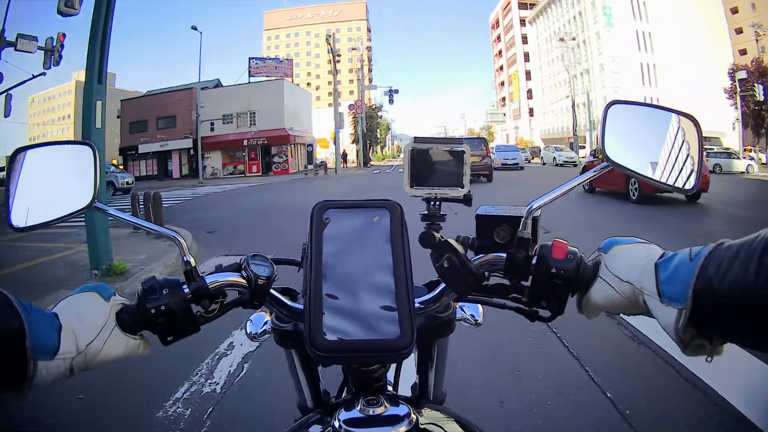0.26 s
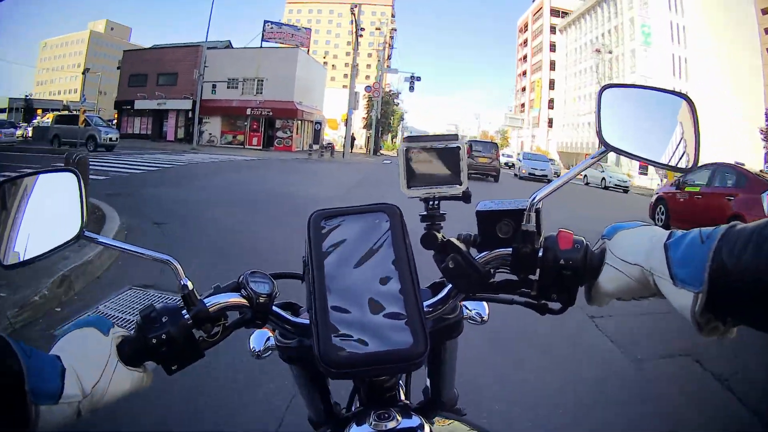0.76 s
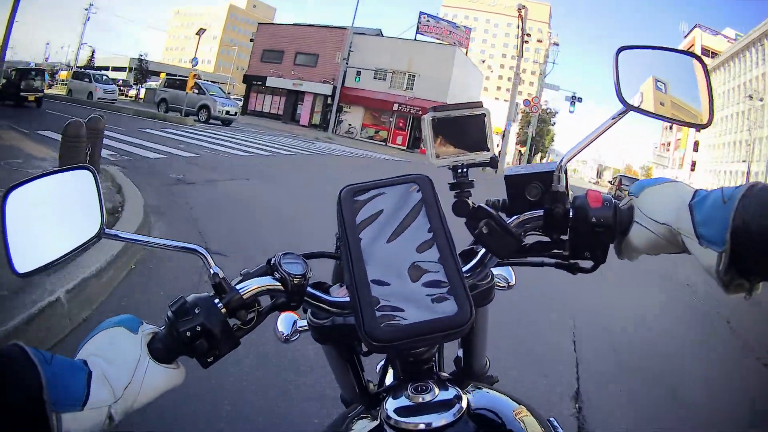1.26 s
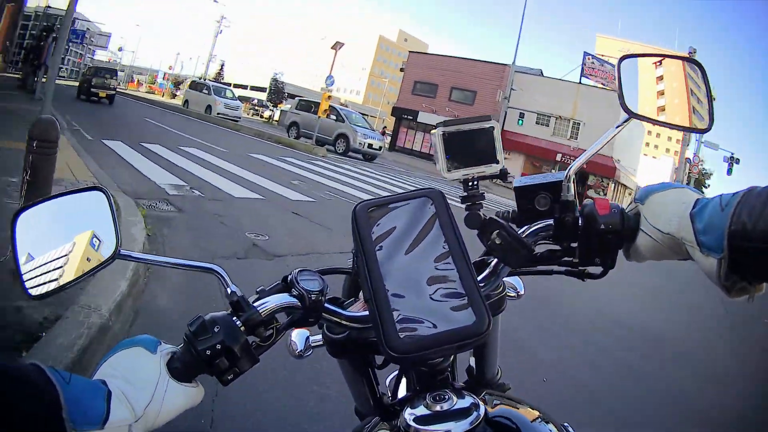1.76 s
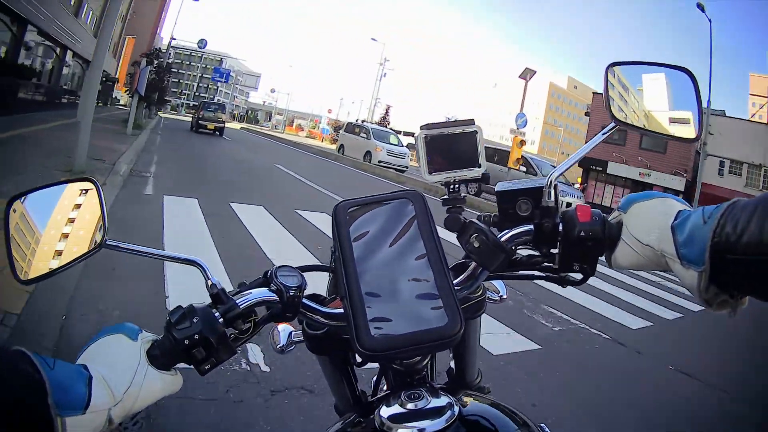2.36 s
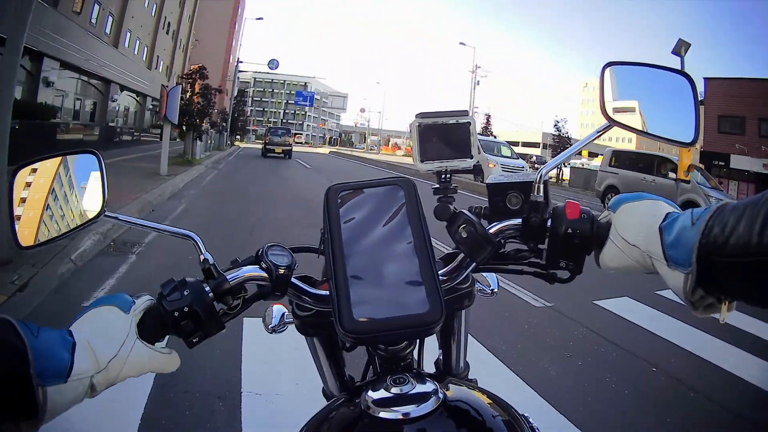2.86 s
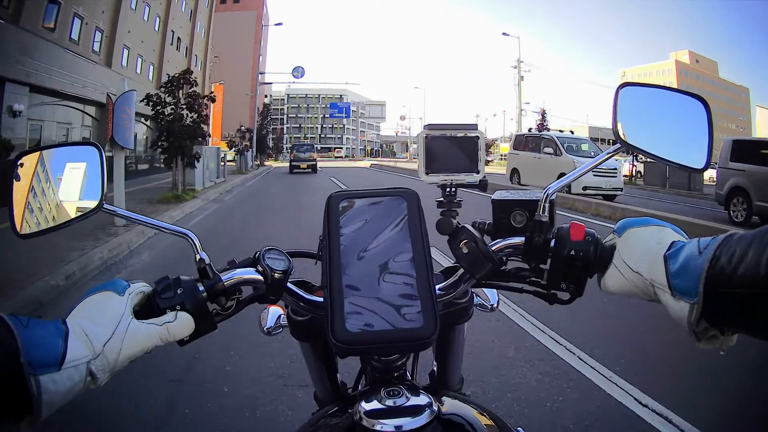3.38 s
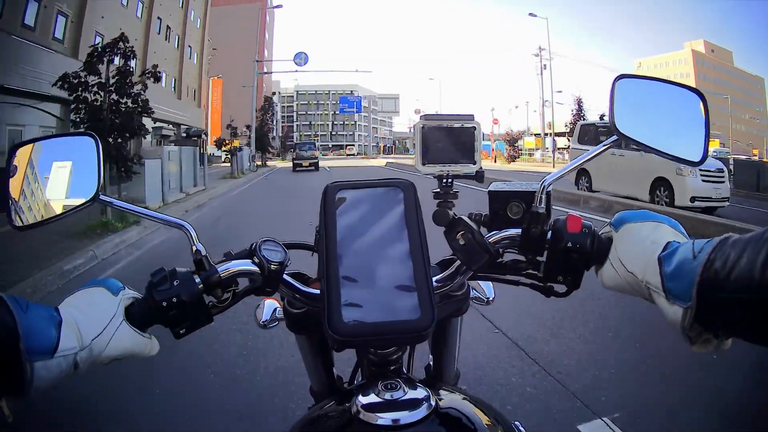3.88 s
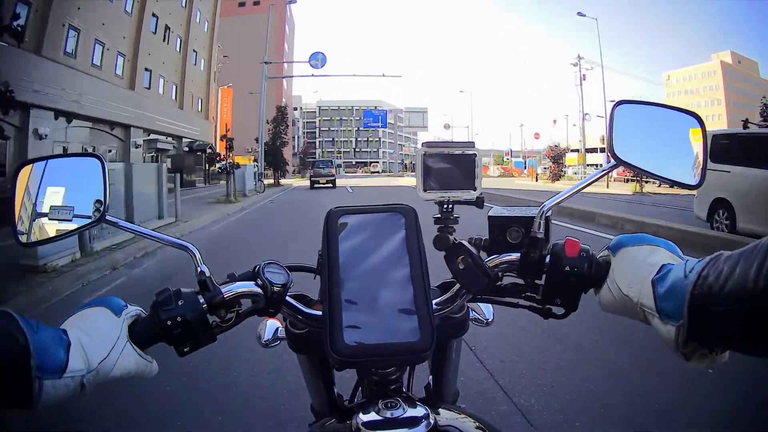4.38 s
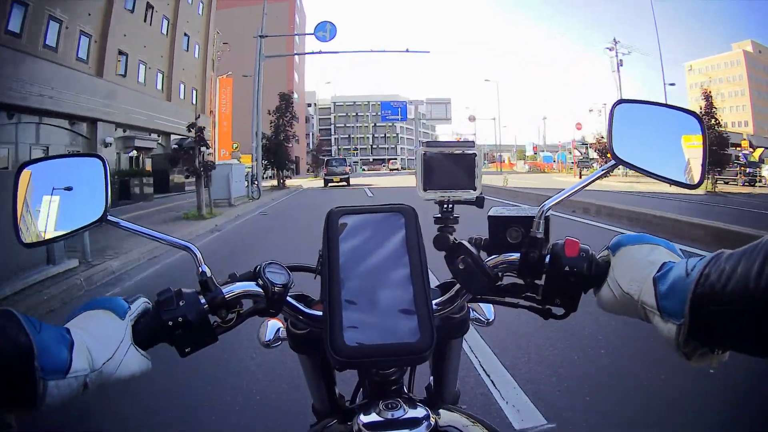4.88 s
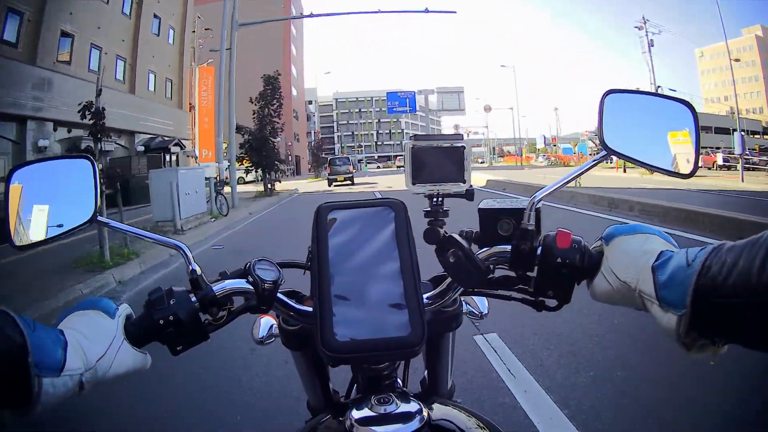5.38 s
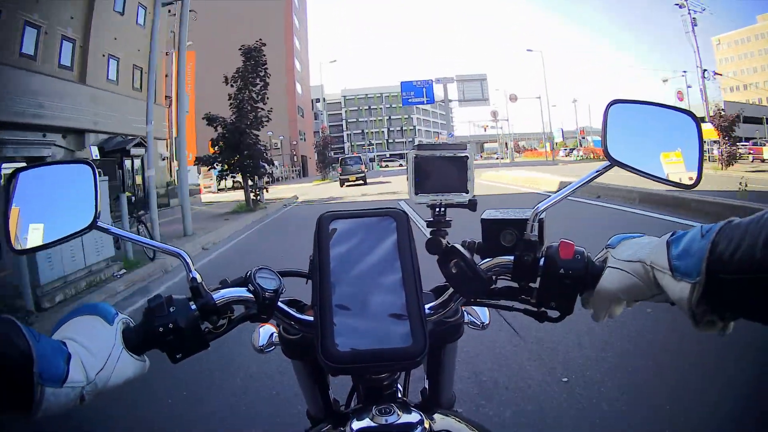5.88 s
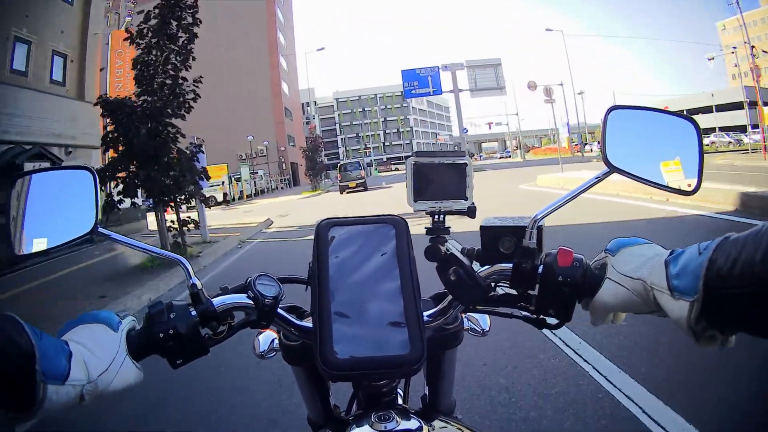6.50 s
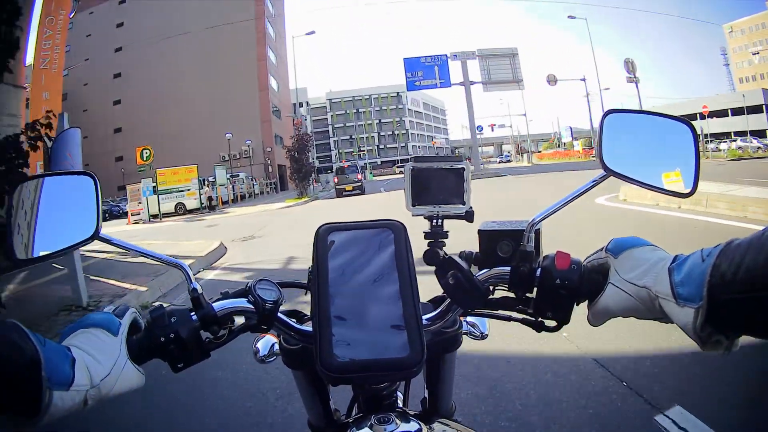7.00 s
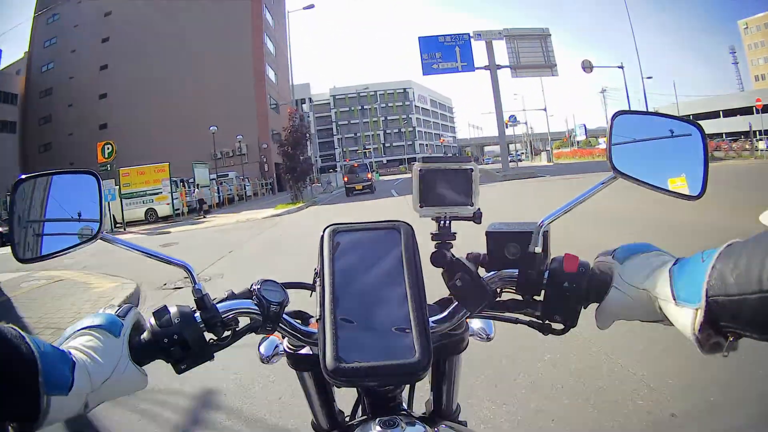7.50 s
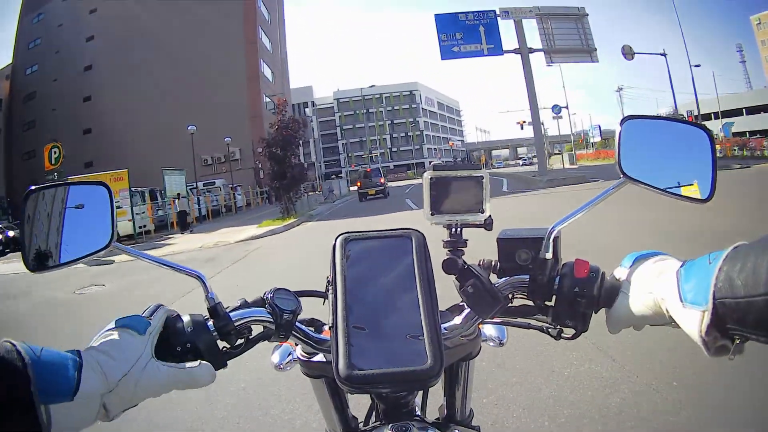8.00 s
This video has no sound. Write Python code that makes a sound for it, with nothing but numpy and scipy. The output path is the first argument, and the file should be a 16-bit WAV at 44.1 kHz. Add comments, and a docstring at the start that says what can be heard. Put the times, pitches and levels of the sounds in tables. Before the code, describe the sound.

A small single-cylinder motorcycle dips off throttle, pulls steadily harder up through the revs, then shuts off with uneven thumps, clunks and rolling coast.

```python
"""A single-cylinder motorcycle leaves a corner, heard from a cased microphone on the rider. The throttle shuts
for half a second, then opens for a long pull: firings thump pipe and silencer modes, suction hisses, the air
box rings, gear tones climb, and tyre roar and gusts of noise swell. At 5.6 s it shuts again: the revs fall and
rise, the thumps turn uneven, metal parts clunk, and bumps and overrun barks knock the frame; it rolls on with
thin gear tones. A faint electronic tone lasts throughout."""
import sys
import numpy as np
from scipy import signal
from scipy.io import wavfile
from scipy.ndimage import uniform_filter1d

SR = 44100
rng = np.random.default_rng(int(sys.argv[2]) if len(sys.argv) > 2 else 0)


def digitize_waveform(pressure):
    """Quantize a signal to 16-bit integers and store it at the path in sys.argv[1].

    Rows of a 2-D input are taken as channels; values are limited to [-1, 1].
    """
    field = np.atleast_2d(pressure).T
    bounded = np.clip(field, -1, 1)
    quanta = np.round(bounded * 32767).astype(np.int16)
    wavfile.write(sys.argv[1], SR, quanta)


N = 363825


# exhaust load: (time [s], relative thump level [dB])
THUMP_LOAD = [(0.0, -29), (0.55, -27), (0.87, -35.5), (1.06, -31), (1.15, -26.5), (1.35, -26),
              (2.44, -23.5), (3.86, -24), (4.37, -18), (5.47, -18), (5.63, -22), (5.79, -33.5), (6.25, -24),
              (6.43, -46), (6.56, -31), (6.6, -19), (6.8, -28.5), (7.0, -30.5), (7.31, -30), (7.5, -32),
              (7.78, -34), (7.95, -27), (8.25, -35)]
# off the throttle some firings burn fully and some miss: (time [s], relative level [dB])
UNEVEN_FIRINGS = [(.607, -26), (.662, -23), (.74, -26), (.933, -17.5), (1.068, -23.5), (5.612, -9.5),
                  (5.684, -20), (5.764, -17), (5.8, -19.5), (5.84, -19), (5.923, -15.5), (6.097, -12),
                  (6.2, -34), (6.31, -21), (6.37, -15.5), (6.425, -23.5), (6.485, -13.5), (6.545, -18),
                  (6.6, -12), (6.657, -19), (6.703, -15.5), (6.76, -17), (6.855, -17), (6.902, -16.5),
                  (6.95, -18), (6.991, -16), (7.096, -16.5), (7.291, -24), (7.387, -19.5), (7.44, -21),
                  (7.487, -17), (7.535, -17.5), (7.686, -16.5), (7.74, -24), (7.788, -25), (7.842, -18.5),
                  (7.943, -16), (7.994, -17), (8.05, -21), (8.1, -18), (8.154, -22.5), (8.204, -17)]
# upper exhaust pipe modes: (frequency [Hz], level [dB], t60 [s], rise [s])
UPPER_PIPE_MODES = [(228.8, -8, 0.12, 0.0084), (321.4, 4.5, 0.082, 0.0042), (340.9, 5, 0.083, 0.011),
                    (386.4, 1.5, 0.087, 0.0081)]
# silencer shell: (frequency [Hz], level [dB], t60 [s], rise [s])
SILENCER_SHELL = [(413, 15.5, 0.0073, 0.0013), (540.7, -13, 0.13, 0.033), (736.8, -9.5, 0.12, 0.0054),
                  (910, -19.5, 0.07, 0.01)]
# low engine orders: (multiple of the firing rate, level [dB])
ENGINE_ORDERS = [(2, -19), (3, -19), (4, -9), (5, 0)]
# shell growl over the thump, a level law (columns at law())
GROWL_LAW = (-10.5, 7.5, 0.5, 11)


def exhaust():
    """One pressure pulse a firing, with some turbulence, rings the pipe and the silencer."""
    thump_db, bark_db = curves(THUMP_LOAD)[0], curves(INLET_LEVELS)[0]
    growl_db, orders_db = law(*GROWL_LAW), by_speed(ORDERS_COL)
    upper = ring(UPPER_PIPE_MODES)
    drive = exhaust_drive(thump_db, upper)
    late = np.zeros(round(.003 * SR))  # the upper modes answer a moment after the pulse
    bark = signal.oaconvolve(drive, np.r_[late, upper])[:N]
    growl = signal.oaconvolve(drive, ring(SILENCER_SHELL))[:N]
    turn = 2 * np.pi * crank()
    orders = evened(sum(gain_of(db) * np.cos(k * turn) for k, db in ENGINE_ORDERS))
    return (exhaust_thump(drive, thump_db) + gain_of(bark_db) * bark + chamber(np.r_[late, drive][:N])
            + gain_of(growl_db) * growl + gain_of(thump_db + orders_db) * orders)


RETARD_S = .0024  # the pulse comes later with the throttle shut


def exhaust_drive(thump_db, upper):
    """Pressure pulses of varying strength, each trailing a fading burst of turbulence."""
    at, low = firings(.016), ring(LOW_PIPE_MODES)
    chance_db = .7 * rng.standard_normal(len(at))
    size = gain_of(thump_db[at] + chance_db) * np.sqrt(np.gradient(at)) / np.linalg.norm(low)
    for s, level_db in UNEVEN_FIRINGS:
        nearest = np.argmin(abs(at + .011 * SR - s * SR))
        size[nearest] = gain_of(level_db) / abs(low + upper).max()
    delay = np.round(RETARD_S * SR * (1 - throttle()[at])).astype(int)
    pulses = np.zeros(N)
    pulses[np.minimum(at + delay, N - 1)] = size
    t = np.arange(SR // 8) / SR
    swirl = signal.oaconvolve(pulses, np.exp(-t / 0.016))[:N] * rng.standard_normal(N)
    return pulses + gain_of(-49) * swirl


# steady pipe noise over the thump, a level law (columns at law())
DRONE_LAW = (-26.5, -1.5, 2.3, 11)
BASS_CUT_HZ = 76
MUFFLE_HZ, MUFFLE_WIDTH_HZ = 203, 30  # the silencer swallows this band


def exhaust_thump(drive, thump_db):
    """Low pipe modes answer the pulses and an echo from the open end; steady noise drones in the pipe."""
    bass_cut = signal.butter(4, BASS_CUT_HZ, "high", fs=SR, output="sos")
    thump = signal.sosfilt(bass_cut, pipe(drive))
    echo = round(.0066 * SR)
    thump[echo:] += 1.1 * thump[:-echo]
    drone = evened(pipe(rng.standard_normal(N)))
    thump = .5 * thump + gain_of(thump_db + law(*DRONE_LAW)) * drone
    return signal.lfilter(*signal.iirnotch(MUFFLE_HZ, MUFFLE_HZ / MUFFLE_WIDTH_HZ, SR), thump)


# low exhaust pipe modes, gas cold: (frequency [Hz], level [dB], t60 [s], rise [s])
LOW_PIPE_MODES = [(123, -3.5, 0.09, 0.0078), (144.3, 7, 0.13, 0.00081), (173, -7.5, 0.034, 0.0015)]
# warmth of the exhaust gas: (time [s], heat [0-1])
GAS_HEAT = [(0, 0), (3.9, 0.4), (4.9, 0.8), (5.3, 0.76), (5.65, 0.72), (5.8, 0.6), (8.25, 0)]
HOT_SHARE = 0.082  # the low pipe modes rise by this share as the gas heats
COLD_RING = 1.046  # cool gas rings longer by this factor


def pipe(x, count=3):
    """The low pipe modes, tuned and damped by the heat of the gas; fixed heats are crossfaded."""
    step = np.clip(curves(GAS_HEAT)[0], 0, 1) * (count - 1)
    total = 0
    for k, heat in enumerate(np.linspace(0, 1, count)):
        share = np.clip(1 - abs(step - k), 0, 1)
        response = ring(LOW_PIPE_MODES, 1 + HOT_SHARE * heat, COLD_RING ** (1 - heat))
        total = total + signal.oaconvolve(x * share, response)[:N]
    return total


# silencer chamber, its pitch moving with time: (time [s], frequency [Hz], level over the drive [dB])
CHAMBER_PITCH = [(0, 254, -17.5), (2.1, 252, -16.5), (2.9, 267, -9.5), (3.7, 300, -6), (4.1, 301.4, -3),
                 (4.45, 304, -11), (4.75, 306.7, -6.5), (5.0, 300, -13), (5.3, 304.6, -5.5),
                 (5.7, 299.7, -10.5), (8.25, 254, -12)]
CHAMBER_WIDTH_HZ = 26.5


def chamber(x):
    """A resonance that follows its pitch curve: shift down, smooth twice, shift back."""
    hz, over_db = curves(CHAMBER_PITCH)
    turn = np.exp(2j * np.pi * np.cumsum(hz) / SR)
    r = np.exp(-np.pi * CHAMBER_WIDTH_HZ / SR)
    smooth = signal.lfilter([np.e * (1 - r)], [1, -2 * r, r * r], x / turn)  # peak 1 for one click
    return gain_of(over_db) * (turn * smooth).imag


# (time [s], bark of the upper pipe modes over the thump [dB], relative suction hiss level [dB])
INLET_LEVELS = [(0, 0.5, -70), (.55, -1, -68), (.7, 3, -66), (1.1, 0.5, -65.5), (1.5, 0.5, -63.5),
                (1.8, -1, -56), (2.5, 2, -54.5), (3.3, 2, -55), (3.95, 5, -53), (4.4, -1.5, -51),
                (5.4, 2.5, -48.5), (5.6, 0.5, -52), (5.9, 7, -54), (6.3, -2, -69), (6.7, -1.5, -57.5),
                (7.3, -0.5, -69), (8.25, -3.5, -72)]
# the inlet valve opens this share of a cycle plus this long ahead of the cycle mark
VALVE_LEAD, VALVE_EARLY_S = .27, .0105
# suction after the valve opens: (delay [s], length [s], level [dB])
SUCTION_GULPS = [(0, 0.0046, -6.5), (.0055, .004, -7), (0.014, .008, -0.5)]
# colour of the suction hiss: (frequency [Hz], level [dB per Hz])
SUCTION_COLOUR = [(1500, -22.5), (1830, 9.5), (2000, 2), (2210, 4.5), (2310, -19.5), (2410, 0.5),
                  (2600, -0.5), (2860, -6), (3300, -7), (4000, -10.5), (5000, -20.5), (6500, -52)]


def intake():
    """The inlet valve snaps and suction hisses in gulps; air rasps into the box, which rings."""
    hiss_db = curves(INLET_LEVELS)[1]
    rings, rasp = air_box_rings(), rushing_air()
    gulps = sum(gain_of(db) * puffs(VALVE_EARLY_S - delay, length, VALVE_LEAD)
                for delay, length, db in SUCTION_GULPS)
    snap = valve_snap(hiss_db)
    suction = (0.5 + 0.6 * evened(gulps)) * noise(SUCTION_COLOUR, patchy_db=-1.5, size=512)
    return rings + rasp + snap + gain_of(hiss_db) * suction


# air box, main, lower and middle ring: (frequency [Hz], level before evening out [dB], t60 [s], rise [s])
AIR_BOX_MODES = [(1575, 0, .029, .006), (1295, 0, .04, .005), (1440, 0, .018, .004)]


def air_box_rings():
    """Each firing knocks three air-box modes with a slightly uneven pulse and a puff of noise."""
    rings = 0
    levels = [by_speed(column) for column in (RING_COL, LOWER_RING_COL, MIDDLE_RING_COL)]
    for db, mode, early_s in zip(levels, AIR_BOX_MODES, (.0015, .007, .011)):
        pulses = np.zeros(N)
        at = firings(early_s)
        pulses[at] = gain_of(1.5 * rng.standard_normal(len(at)))
        drive = pulses + gain_of(-38) * puffs(early_s + .002, .012) * rng.standard_normal(N)
        rings = rings + gain_of(db) * evened(signal.oaconvolve(drive, ring([mode]))[:N])
    return rings


# air rushing into the box: (frequency [Hz], level [dB per Hz])
RASP_COLOUR = [(1050, -15.5), (1250, -7.5), (1400, 4.5), (1520, -3.5), (1650, -2), (1750, -28)]


def rushing_air():
    """Patchy band noise puffs with each firing as air rushes into the box."""
    level_db = by_speed(MIDDLE_RING_COL) - 7  # under the middle ring
    return gain_of(level_db) * puffs(0.015, 0.0054) * noise(RASP_COLOUR, patchy_db=7.5, size=512)


# inlet tract: (frequency [Hz], level [dB], t60 [s], rise [s])
INLET_TRACT = [(600, 6, .015, .001), (1830, -2, .035, .0005), (2020, 0, .025, .0005),
               (2210, 0, .035, .0005), (2410, -2, .035, .0005), (2650, -4, .03, .0005),
               (2860, -6, .03, .0005), (3150, -9, .02, .0005)]


def valve_snap(hiss_db):
    """The opening inlet valve strikes the tract with a click and a short scrape, never twice alike."""
    at, clicks = firings(VALVE_EARLY_S + .001, VALVE_LEAD), np.zeros(N)
    clicks[at] = gain_of(1.2 * rng.standard_normal(len(at)))
    burst = signal.windows.hann(round(.005 * SR))
    scrape = signal.oaconvolve(clicks, burst, "same") * np.sign(rng.standard_normal(N))
    over_db = law(centre_db=0, per_krpm_db=-5, per_load=0, shut_db=-14)  # over the suction hiss
    snaps = signal.oaconvolve(6 * clicks + scrape, ring(INLET_TRACT))[:N]
    return gain_of(hiss_db + over_db) * evened(snaps)


# two gear pairs, a list for each: (multiple of the firing rate, level [dB])
GEAR_PAIRS = [
    [(38, -8), (39, -7), (40, 0), (41, -1), (42, -2)],
    [(43, -4), (44, 0), (45, -5), (46, -9)],
]
SWAP_RPM, SWAP_DB_PER_KRPM = 2850, 17  # the lower pair takes over above this speed
# engine cover: (frequency [Hz], level [dB], t60 [s], rise [s])
ENGINE_COVER = [(470, -3, .04, .001), (560, 0, .05, .001), (630, 0, .05, .001), (708, 1, .05, .001),
                (790, -2, .04, .001), (860, 0, .05, .001)]


def gears():
    """The whine of two gear pairs climbs with the engine; a dense band of firing harmonics rings the engine
    cover."""
    whine_db, rattle_db = by_speed(WHINE_COL), by_speed(RATTLE_COL)
    harmonics = cluster([(k, 0) for k in range(17, 34)], 5, 3, crank())
    rattle = signal.oaconvolve(harmonics, ring(ENGINE_COVER))[:N]
    swap_db = np.clip(SWAP_DB_PER_KRPM * (curves(CRANK_SPEED)[0] - SWAP_RPM) / 1000, -1.5, 6)
    whine = sum(gain_of(whine_db - 4 + sign * swap_db) * cluster(pair, 1.9, 7, crank())
                for sign, pair in zip((1, -1), GEAR_PAIRS))
    return overrun_tones() + whine + gain_of(rattle_db) * evened(rattle)


# gearbox shaft while rolling: (time [s], speed [turns per s])
SHAFT_SPEED = [(0, 22), (6.55, 21.75), (6.9, 20.95), (7.3, 20.35), (7.57, 20.1), (8.25, 18.9)]
# thin gear tones on the overrun: (multiple of the shaft rate, start [s], end [s], level [dB])
OVERRUN_TONES = [(26, 6.58, 7.3, -44), (35, 6.6, 6.95, -49), (39, 6.55, 6.83, -45), (42, 6.88, 7.32, -43),
                 (42, 7.56, 8.0, -43)]


def overrun_tones():
    """Thin wavering tones at multiples of the gearbox shaft speed fade in and out."""
    t = np.arange(N) / SR
    shaft = np.cumsum(curves(SHAFT_SPEED)[0]) / SR
    tones = 0
    for k, start, end, db in OVERRUN_TONES:
        fade = np.clip(np.minimum(t - start, end - t) / .06, 0, 1)
        tones = tones + gain_of(db) * fade * cluster([(k, 0)], 2.2, 4, shaft)
    return tones


# gearbox and chassis clunks: (time [s], relative level [dB])
CLUNK_HITS = [(1.299, -21), (5.746, -19), (5.904, -41), (5.939, -11.5), (5.961, -16), (6.03, -24),
              (6.091, -34), (6.141, -38), (6.6, -29), (6.7, -21)]
# gearbox casing: (frequency [Hz], level [dB], t60 [s], rise [s])
CASING_MODES = [(413, -6, 0.041, 0.00017), (515, 6.5, 0.018, 0.00062), (680, 5.5, 0.021, 0.00051),
                (880, 2.5, 0.022, 0.00022), (1500, -13, 0.02, .0003), (2300, -19, 0.017, 0.00018),
                (3130, -20.5, 0.011, .0002), (4120, -27, 0.013, .0002)]
# road bumps through the frame, and from 6.59 s exhaust barks on the overrun knocking the same frame: (time [s],
# relative level [dB])
FRAME_KNOCKS = [(4.7, -12), (5.27, -13), (5.4, -12.5), (5.708, -12), (6.188, -9.5), (6.242, -9.5),
                (6.482, -21.5), (6.592, -13.5), (6.622, -15), (6.697, -14.5), (7.045, -16.5), (7.088, -20),
                (7.187, -35), (7.236, -48)]
# frame: (frequency [Hz], level [dB], t60 [s], rise [s])
FRAME_MODES = [(60, -5, 0.03, 0.0065), (137, 12.5, 0.012, 0.00076), (206, 10, 0.032, 0.00097),
               (325, 1.5, 0.035, 0.0032), (550, -8, 0.013, 0.0017)]


def hits():
    """Clunks ring the casing; road bumps and overrun barks thud through the frame."""
    return knocks(CLUNK_HITS, CASING_MODES, 0.01) + knocks(FRAME_KNOCKS, FRAME_MODES, .006)


def knocks(events, modes, scrape_s):
    """Single blows on one ringing part, each followed by a short rattle."""
    blows, knock, t = np.zeros(N), ring(modes), np.arange(SR // 10) / SR
    for s, level_db in events:
        blows[round(s * SR)] = gain_of(level_db) / abs(knock).max()
    fade = np.exp(-t / scrape_s) / np.sqrt(scrape_s * SR)
    rattle = signal.oaconvolve(blows, fade)[:N] * rng.standard_normal(N)
    return signal.oaconvolve(.9 * blows + .45 * rattle, knock)[:N]


# tyre and engine roar: (frequency [Hz], level [dB per Hz])
ROAR_COLOUR = [(40, -21), (90, -11), (145, -4), (230, -2), (330, -3), (440, -4), (545, 0), (690, -3),
               (860, -2), (1150, -7), (1380, -11), (1600, -21), (2100, -29), (2500, -34)]
# its level law (columns at law())
ROAR_LAW = (-32, 2.5, 0.45, -2)


def rolling():
    """Tyre and engine roar: broad noise that swells a little with each firing."""
    pulse = 0.81 + 0.14 * puffs(0.017, 0.02)
    return gain_of(law(*ROAR_LAW)) * pulse * noise(ROAR_COLOUR, patchy_db=1.0)


# noise colours, all (frequency [Hz], level [dB per Hz]):
# fizz through the resonances of the case, valve tick, narrow valve-gear ping, top hiss
FIZZ_COLOUR, TICK_COLOUR = [(2200, -16), (2700, 1), (2900, -1), (3070, -1), (3350, -5.5), (3900, -9),
                            (4030, -2), (4140, -11.5), (4900, -22.5), (5770, -27.5), (7000, -36.5)], [(4800, -27.5), (5400, -13), (5770, -9), (6200, -15),
                                          (7000, -24.5)]
PING_COLOUR, HISS_COLOUR = [(2780, -22), (2870, -5), (2960, 2.5), (3010, -3.5), (3100, -21.5)], [(6300, -8), (7300, -2), (8550, 4), (9400, -0.5), (10200, 3),
                                          (10700, -3), (11300, -21)]
# level laws of fizz, ping and hiss (columns at law())
FIZZ_LAW, PING_LAW, HISS_LAW = (-54, 4.5, .5, -1.5), (-68.5, 4.5, 0.93, 2), (-77.5, 5.5, .3, -1.5)
FLICKER_DB = 1.07  # rms


def treble():
    """Valve gear and high noise bands throb with the cycle; the whole treble flickers together."""
    fizz_pulse = 0.4 + 0.13 * puffs(0.011, 0.014)
    fizz = gain_of(law(*FIZZ_LAW)) * fizz_pulse * noise(FIZZ_COLOUR, patchy_db=0.5, size=512)
    tick_pulse = 0.58 + 0.065 * puffs(0.23, 0.0062)
    tick = gain_of(by_speed(TICK_COL)) * tick_pulse * noise(TICK_COLOUR, patchy_db=1.5, size=256)
    ping_pulse = 0.14 + puffs(0, 0.018, 0.3)
    ping = gain_of(law(*PING_LAW)) * ping_pulse * noise(PING_COLOUR, patchy_db=2.0, size=512)
    hiss_pulse = 0.85 + .2 * puffs(0.011, 0.012)
    hiss = gain_of(law(*HISS_LAW)) * hiss_pulse * noise(HISS_COLOUR, patchy_db=1.0, size=512)
    flicker = uniform_filter1d(uniform_filter1d(rng.standard_normal(N), size=900), size=900)
    return gain_of(FLICKER_DB * evened(flicker)) * (fizz + tick + ping + hiss)


# wind on the case: (time [s], level [dB])
WIND_LEVEL = [(0.0, -46), (1.45, -59.5), (2.5, -52.5), (3.5, -51.5), (4.3, -37.5), (5.0, -31.5),
              (6.3, -55.5), (6.9, -37.5), (8.25, -39)]
# single gusts, added to it: (middle [s], length [s], level [dB])
WIND_GUSTS = [(3.18, 0.088, -37), (3.325, 0.062, -31), (4.72, 0.14, -32), (5.366, 0.26, -29),
              (5.756, 0.33, -28), (6, 0.28, -32.5), (6.503, 0.3, -37)]
# colour of the wind: (frequency [Hz], level [dB per Hz])
WIND_COLOUR = [(15, -4.5), (35, -5.5), (70, -4), (130, -1), (260, -11.5), (500, -43)]


def wind():
    """Lumpy low noise of wind on the case, with a few bell-shaped gusts."""
    t = np.arange(N) / SR
    gusts = sum(gain_of(db) * np.exp(-(2 * (t - s) / length) ** 2) for s, length, db in WIND_GUSTS)
    return (gain_of(curves(WIND_LEVEL)[0]) + gusts) * noise(WIND_COLOUR, patchy_db=1.5, size=2048)


# thin steady electronic tone: (frequency [Hz], level [dB rms])
WHISTLE_TONE = [(9991, -92)]


def whistle():
    """A steady sine, high and very faint."""
    t = np.arange(N) / SR
    return sum(np.sqrt(2) * gain_of(db) * np.sin(2 * np.pi * hz * t) for hz, db in WHISTLE_TONE)


# crank: (time [s], speed [rpm])
CRANK_SPEED = [(0.0, 2082.5), (0.21, 1914.1), (0.74, 1730.1), (1.29, 2052.0), (1.43, 1835.7), (2.5, 2251.8),
               (3.51, 2508.4), (4.08, 2737.4), (5.07, 3303.6), (5.56, 3517.1), (6.4, 1922.1), (6.7, 2364.3),
               (6.87, 2493.1), (7.39, 2437.1), (8.25, 2255.2)]
FIRST_CYCLE = .4375  # part of the cycle done at the start


def crank():
    """Engine cycles done; a four-stroke fires once in two turns."""
    return FIRST_CYCLE + np.cumsum(curves(CRANK_SPEED)[0]) / (2 * 60 * SR)


def firings(early_s, lead=0):
    """Sample of each firing, moved early_s and a share of a cycle ahead of the cycle mark."""
    at = np.flatnonzero(np.diff(np.floor(crank() + lead)) > 0) - round(early_s * SR)
    return at[(at >= 0) & (at < N)]


def puffs(early_s, last_s, lead=0):
    """A window that opens with each firing and fades, mean power 1."""
    clicks, t = np.zeros(N), np.arange(SR // 8) / SR
    clicks[firings(early_s, lead)] = 1
    return evened(signal.oaconvolve(clicks, t * np.exp(-2 * t / last_s))[:N])


# throttle open: (start [s], end [s])
THROTTLE_PULLS = [(0, 0.568), (1.12, 5.62)]
TWIST_S = 0.1  # the throttle takes this long to open or shut


def throttle():
    """Throttle grip, 0 shut to 1 open; a pull that starts at zero is open from the outset."""
    t = np.arange(N) / SR
    grip = 0
    for start, end in THROTTLE_PULLS:
        since = t - start if start > .05 else 1
        grip = grip + np.clip(np.minimum(since, end - t) / TWIST_S + .5, 0, 1)
    return grip


# A level law is (level at the centre [dB], slope [dB per 1000 rpm],
# slope under throttle [dB per dB of load], change with the throttle shut [dB])
MID_RPM, MID_LOAD_DB = 2400, -24  # the centre


def law(centre_db, per_krpm_db, per_load, shut_db):
    """A level in dB that follows speed, load and throttle."""
    grip = throttle()
    speed_db = per_krpm_db * (curves(CRANK_SPEED)[0] - MID_RPM) / 1000
    load_db = per_load * (curves(THUMP_LOAD)[0] - MID_LOAD_DB)
    return centre_db + speed_db + grip * load_db + (1 - grip) * shut_db


# what swells and sinks as the speed passes resonances, throttle open and shut: (speed [rpm], low orders over
# the thump [dB], air-box ring [dB], lower ring [dB], gear whine [dB], cover buzz of firing harmonics [dB],
# valve tick [dB], middle ring [dB])
OPEN_BY_SPEED, SHUT_BY_SPEED = [(1940, -16.5, -63, -59, -48.5, -49, -68.5, -60),
                                (2140, -12.5, -60.5, -52, -35.5, -54.5, -63.5, -55),
                                (2030, -12, -53, -52, -39.5, -54, -60, -50.5),
                                (2380, -12, -53.5, -63, -36.5, -69, -66.5, -49),
                                (2503, -11, -42, -62.5, -36, -53, -66.5, -51.5),
                                (2740, -8, -41, -49, -31.5, -40, -64, -50),
                                (2795, -11.5, -40.5, -37, -31.5, -39, -64.5, -56),
                                (2925, -19, -48, -38, -31, -34, -63.5, -44.5),
                                (3260, -35, -39, -42, -40.5, -31, -60.5, -48.5),
                                (3450, -28, -36.5, -53, -54, -32, -61.5, -51)], [(1830, -12.5, -72, -75, -52.5, -65, -72.5, -73),
                                              (1990, -23.5, -65.5, -58, -44.5, -36.5, -68, -68.5),
                                              (2380, -34, -69, -75, -47, -53.5, -68.5, -74.5),
                                              (3130, -3.5, -54.5, -80, -45.5, -40, -64, -63)]
ORDERS_COL, RING_COL, LOWER_RING_COL, WHINE_COL, RATTLE_COL, TICK_COL, MIDDLE_RING_COL = range(1, 8)


def by_speed(column):
    """One column of the speed tables in dB, blended by the throttle."""
    rpm, grip = curves(CRANK_SPEED)[0], throttle()
    on, off = (np.interp(rpm, np.transpose(rows)[0], np.transpose(rows)[column])
               for rows in (OPEN_BY_SPEED, SHUT_BY_SPEED))
    return grip * on + (1 - grip) * off


def cluster(orders, steady, waver_hz, cycles):
    """Tones at multiples of a turning rate, each steady in part and wavering in part."""
    turn = 2 * np.pi * cycles
    tones = np.zeros(N)
    for k, db in orders:
        jitter = rng.standard_normal((N, 2)) @ [1, 1j]
        waver = signal.lfilter([1], [1, -np.exp(-np.pi * waver_hz / SR)], jitter)
        carrier = np.exp(1j * (k * turn + 2 * np.pi * rng.random()))
        tones += gain_of(db) * ((steady + waver / np.std(waver)) * carrier).real
    return evened(tones)


def ring(modes, stretch=1, linger=1):
    """Response to one blow: dying sines that take a moment to build up."""
    t = np.arange(SR // 4) / SR
    total = 0
    for hz, db, t60, rise in modes:
        envelope = gain_of(db - 60 * t / (t60 * linger)) * (1 - np.exp(-t / rise)) ** 2
        total = total + envelope * np.sin(2 * np.pi * hz * stretch * t)
    return total


def noise(points, patchy_db, size=1024):
    """Random short-time spectra of a given colour with drifting patches, rms 1."""
    frames, hz = 4 * N // size + 5, np.fft.rfftfreq(size, 1 / SR)
    a, b, patches = rng.standard_normal((frames, len(hz), 3)).T
    patches = evened(uniform_filter1d(uniform_filter1d(patches, size=8, axis=0), size=10, axis=1))
    f, db = np.transpose(points)
    shape_db = np.interp(np.log(hz + 1), np.log(f + 1), db, left=-90, right=-90)
    z = (a + 1j * b) * gain_of(shape_db[:, None] + patchy_db * patches)
    return evened(signal.istft(z, nperseg=size, noverlap=3 * size // 4)[1][:N])


def curves(rows):
    """Each column of a table after the time, sample by sample."""
    s, *columns = np.transpose(rows)
    return [np.interp(np.arange(N) / SR, s, c) for c in columns]


def gain_of(db):
    """Decibels to a factor."""
    return 10 ** (np.asarray(db) / 20)


def evened(x):
    """Scales to rms 1."""
    return x / np.sqrt(np.mean(x ** 2) + 1e-20)


def scene():
    """All sources at one microphone."""
    machine = exhaust() + intake() + gears() + hits()
    return (machine + rolling() + treble() + wind() + whistle())[None]


EDGE_HZ = 11348  # upper band limit


def record(dry):
    """The microphone loses the deepest bass; then the band limit."""
    thin = signal.sosfilt(signal.butter(2, 45, "high", fs=SR, output="sos"), dry)
    band_limit = signal.firwin(511, EDGE_HZ, window=("kaiser", 9), fs=SR)
    return signal.oaconvolve(thin, band_limit[None], "same")


dry = scene()
out = record(dry)
digitize_waveform(out)
```